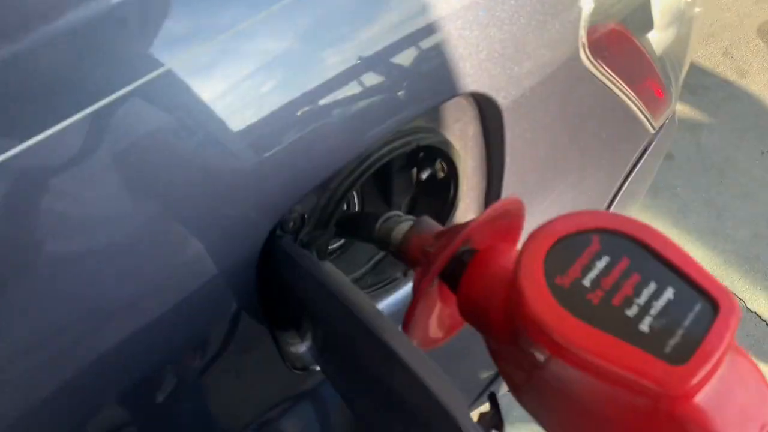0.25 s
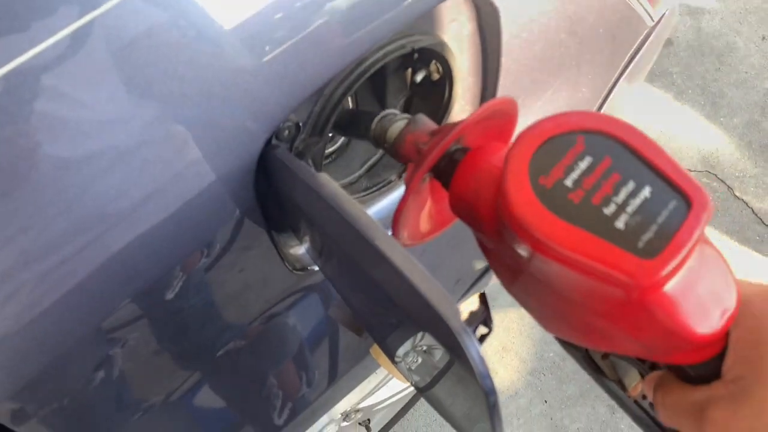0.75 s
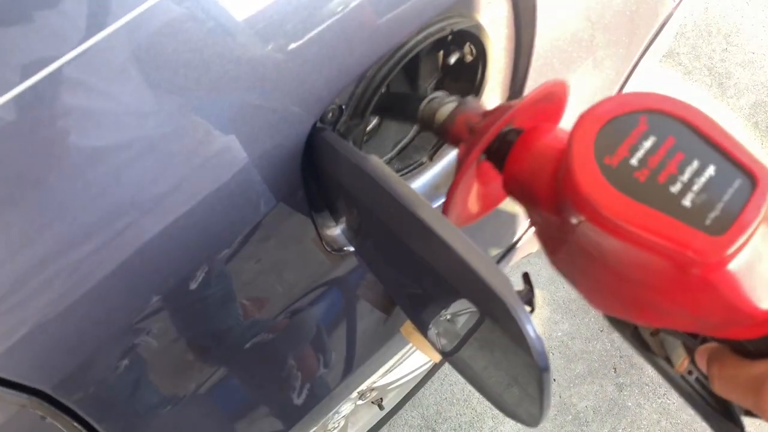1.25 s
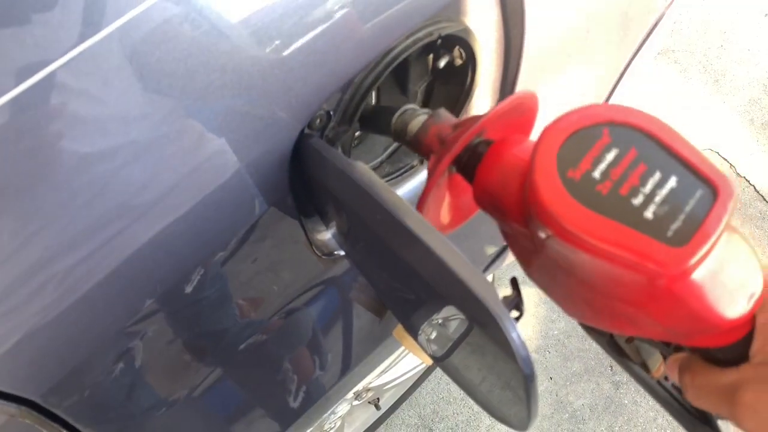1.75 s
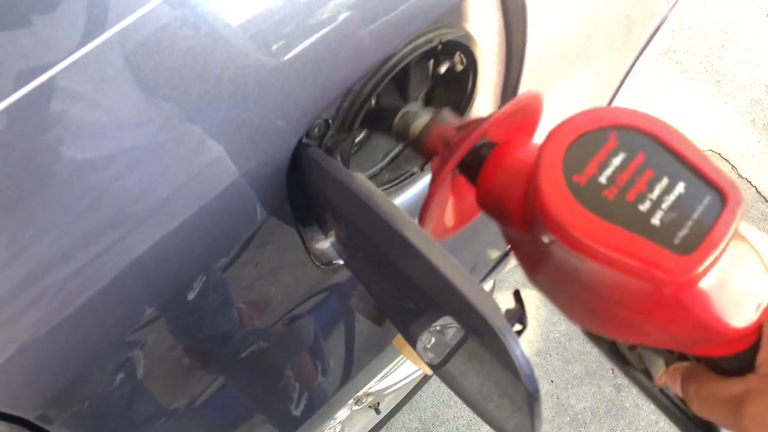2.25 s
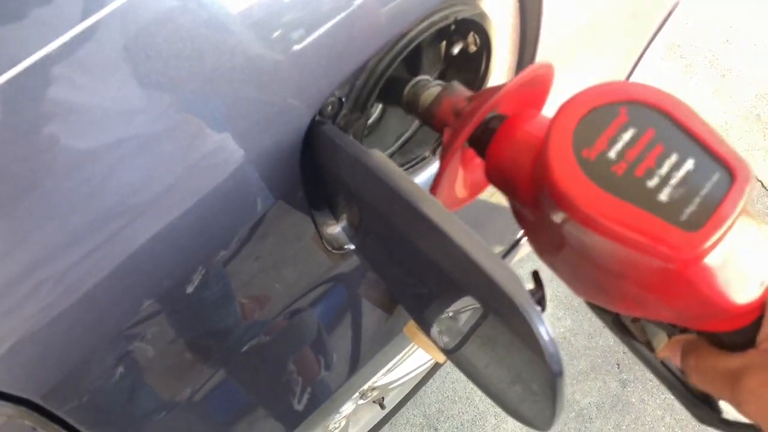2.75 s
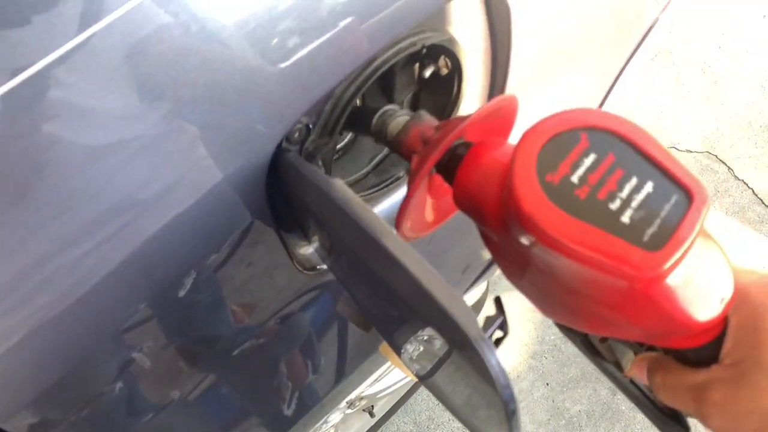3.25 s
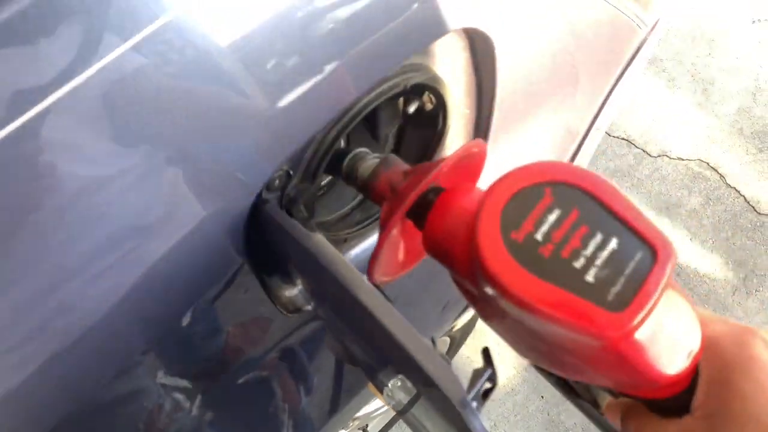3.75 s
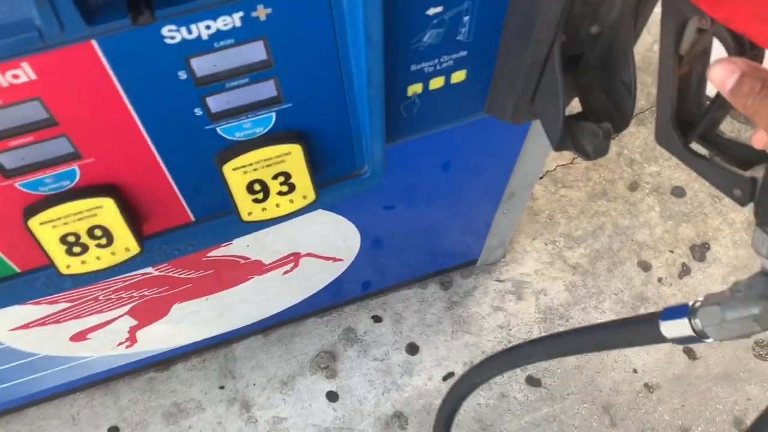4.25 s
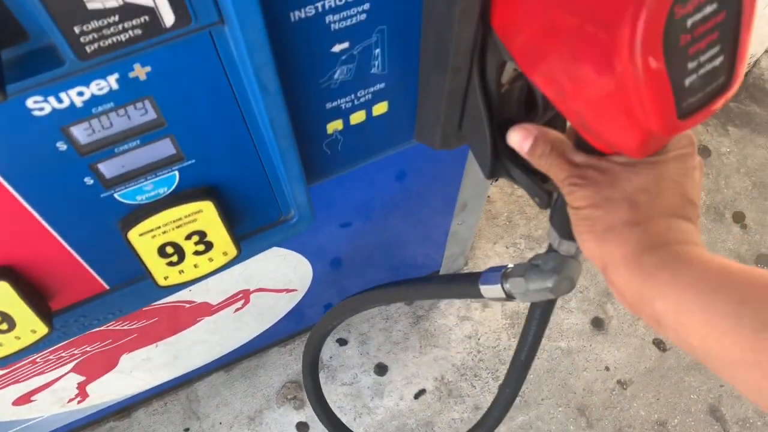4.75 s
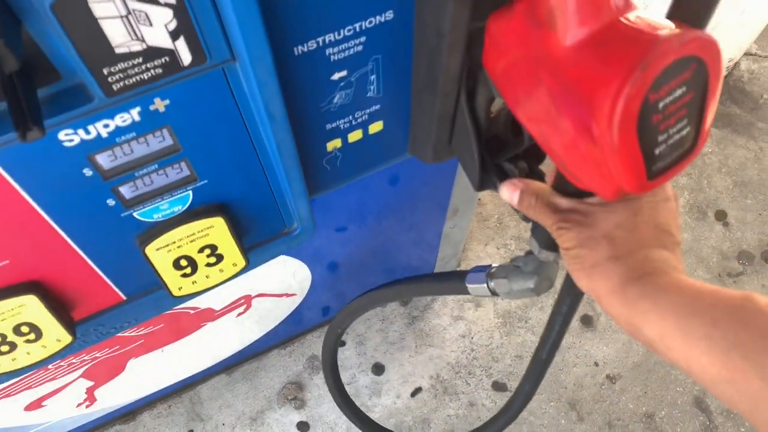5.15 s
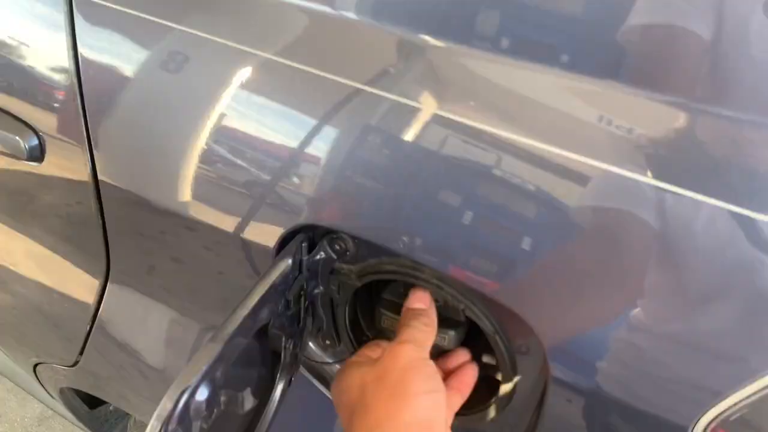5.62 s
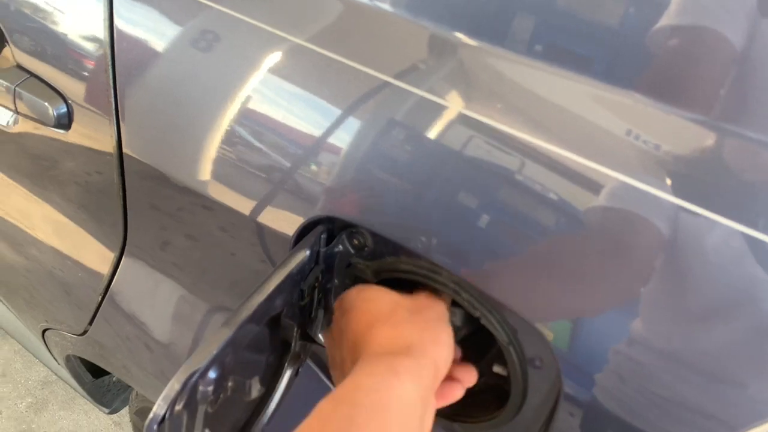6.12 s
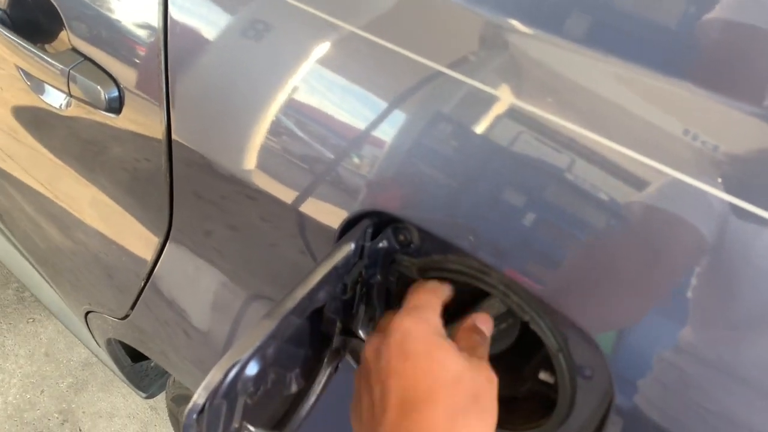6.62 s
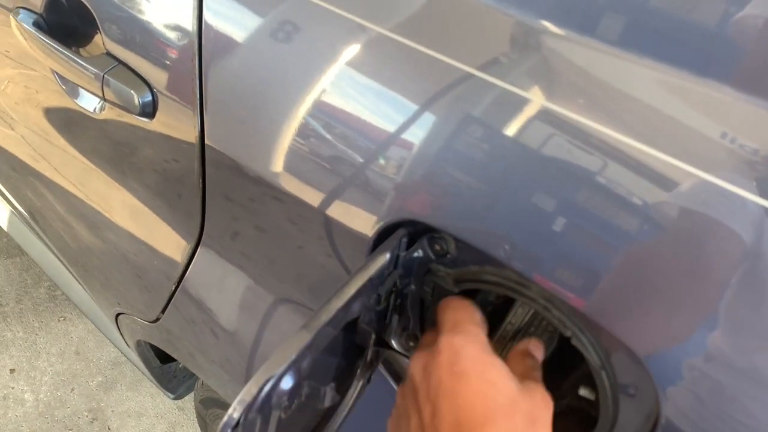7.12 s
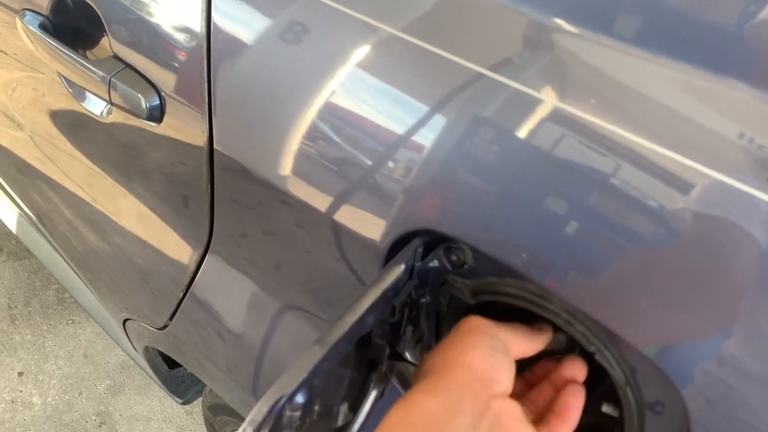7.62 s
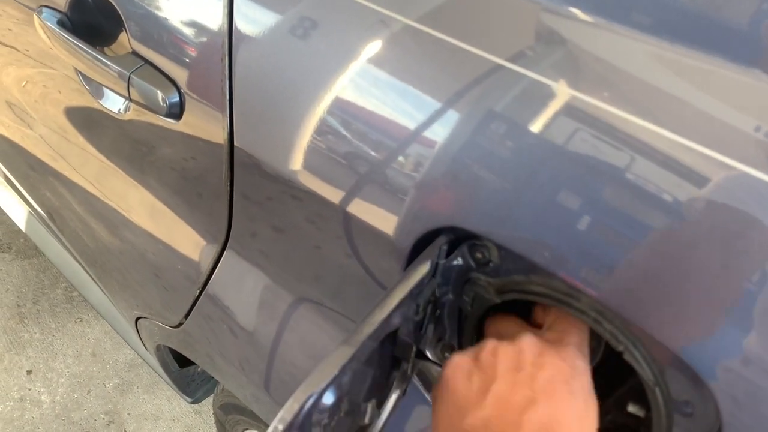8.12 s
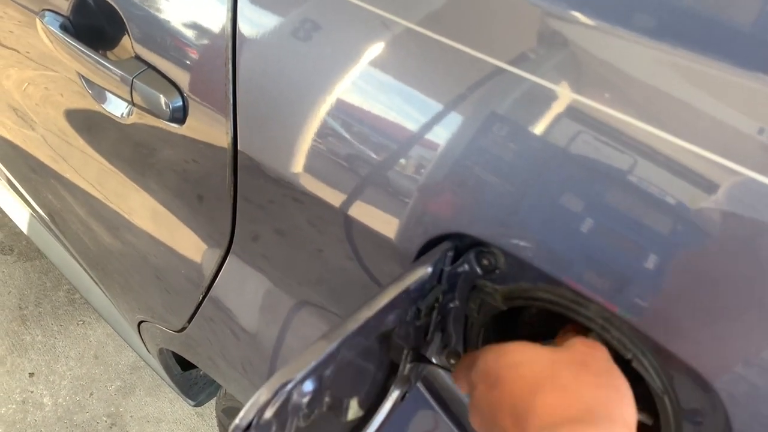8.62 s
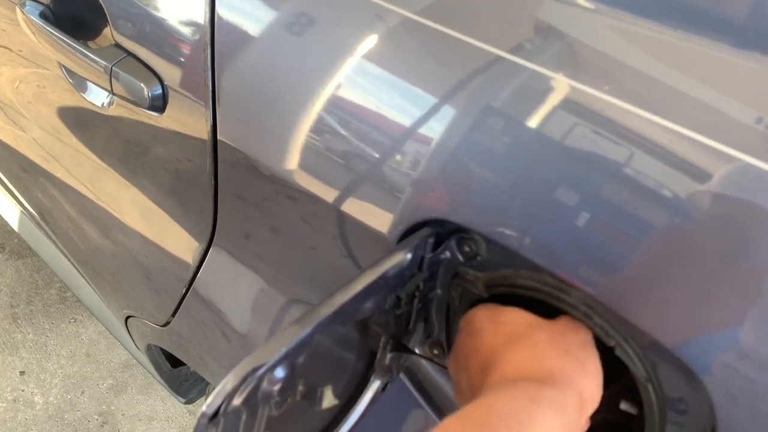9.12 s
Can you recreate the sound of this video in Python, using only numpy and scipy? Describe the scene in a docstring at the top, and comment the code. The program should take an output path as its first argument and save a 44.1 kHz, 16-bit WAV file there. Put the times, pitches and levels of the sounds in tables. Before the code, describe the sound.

Outdoors at a fuel pump, heard close in stereo. From 0 to 0.25 s a fluttering, low rushing noise and cabinet hum; then an abrupt change to a steady low motor hum, drones, traffic rumble, soft air and thin hiss that last to about 9.4 s. A faint bump at 0.3 s. From 0.45 s loud, bright metallic clacks of a squeezed nozzle valve, about five a second, quickening to around ten or more until 3.75 s, with a weak one near 3.95 s. Knocks at 4.0-4.1 s, a brief dip, then hard plastic-and-metal clatter with a deep cabinet thud at 4.2-4.3 s and again at 4.55-4.8 s, small taps to 5.05 s. An engine revs faintly, 4.4-5.3 s. After a dip at 5.65 s, a cap rubs and catches: strong hollow pops near 5.96 and 8.0 s, lighter creaks and snaps between and until 8.95 s, when one drone stops.

```python
"""At a fuel pump: first, for a quarter second, the fluttering rush and hum (noise, sine waves) before the cabinet.
Beside the car, a motor and engines (sines) hum on over rumble, air and a thin hiss (shaped noise).
The nozzle bumps the neck; short squeezes clack its valve about nine times a second (noise and ringing parts).
It is then knocked back into its holster (rattling noise, plastic and metal ringing), shaking the cabinet.
Last, the cap rubs and catches on its thread (noise and neck ringing). The canopy faintly answers the handling."""
import sys
import numpy as np
from scipy import signal
from scipy.fft import rfft, irfft, next_fast_len
from scipy.io import wavfile
from scipy.ndimage import uniform_filter1d, map_coordinates

SR = 44100
rng = np.random.default_rng(int(sys.argv[2]) if len(sys.argv) > 2 else 0)


def wav_record(signal):
    """Record a signal, one row per channel, as 16-bit PCM in the file named by sys.argv[1]."""
    frames = np.transpose(np.atleast_2d(signal))
    bounded = np.clip(frames, -1, 1)
    # unit amplitude maps onto the largest positive 16-bit level
    quanta = np.round(bounded * 32767).astype(np.int16)
    wavfile.write(sys.argv[1], SR, quanta)


N = 413216

# ringing of the metal spout: [multiple of its pitch, level/dB, time to fall 60 dB/s]
SPOUT_MODES = [(.905, -14, .035), (.985, -3, .036), (1, 0, .036), (1.025, -6, .032)]
# ringing of the spout's tip: [multiple of its pitch, level/dB, time to fall 60 dB/s]
TIP_MODES = [(1, 0, .036), (1.025, -6, .032)]
# the spout's highest ringing: [f/Hz, level/dB, time to fall 60 dB/s]
SPOUT_OVERTONES = [(8330, -3, .04), (9820, 0, .04)]
# colour of hard metal contacts: [f/Hz, level/dB]
METAL_COLOUR = [(700, -2), (1100, -14), (1500, -0.5), (2000, 5), (2600, -5.5), (4100, 5.5), (4800, -4.5),
                (5800, 2.5), (7200, -4), (8900, -6.5), (9900, -5.5), (11500, -6.5), (15500, -22.5)]


def amp(db):
    """Turn decibels into a gain."""
    return 10 ** (np.asarray(db) / 20)


def unit(x):
    """Scale to an average (rms) level of 1."""
    return x / np.sqrt(np.mean(x ** 2) + 1e-20)


def along(points, hz):
    """Read a curve of (f/Hz, value) points on a logarithmic frequency axis."""
    f, v = np.transpose(points)
    return np.interp(np.log(hz + 1), np.log(f + 1), v)


def clock():
    """Give the time of every sample in seconds."""
    return np.arange(N) / SR


def curves(rows):
    """Join each column after the time into a curve with one value per sample."""
    s, *columns = np.transpose(rows)
    return [np.interp(clock(), s, column) for column in columns]


def wobble(rate):
    """Draw a smooth random curve through a given number of random points a second."""
    points = rng.standard_normal(int(N * rate / SR) + 4)
    return map_coordinates(points, [clock() * rate])


def fade(t, t60):
    """Die away exponentially, by 60 dB in t60 seconds."""
    return np.exp(-np.log(1000) * t / t60)


def swells(rows):
    """Make bell-shaped envelopes from (t/s, half length/s, level/dB) rows."""
    return sum(amp(db) * np.exp(-((clock() - s) / length) ** 2) for s, length, db in rows)


def add(track, s, sound):
    """Mix a sound into the track at time s."""
    part = track[:, max(round(s * SR), 0):][:, :sound.shape[-1]]
    part += sound[..., :part.shape[1]]


def filtered(x, response):
    """Change the strength and phase of each frequency by a response curve."""
    n = x.shape[-1]
    padded = next_fast_len(n + SR // 10)
    spectrum = rfft(x, padded) * response(np.fft.rfftfreq(padded, 1 / SR))
    return irfft(spectrum, padded)[..., :n]


def rush(spectrum, size=N):
    """Make coloured stereo noise of rms 1, partly alike in both channels."""
    # how alike left and right are: [f/Hz, likeness from 0 to 1]
    likeness = [(100, 1), (330, 0.7), (550, 0.95), (1100, 0.78), (1600, 0.2), (3300, 0.042), (5200, 1),
                (9000, 0.89), (15000, 1)]

    def colour(hz):
        # the angle sets how much noise is shared (mid) and how much is opposed (side)
        angle = np.arccos(np.clip(along(likeness, hz), 0, 1)) / 2
        return amp(along(spectrum, hz)) * [np.cos(angle), np.sin(angle)]

    mid, side = filtered(rng.standard_normal((2, size)), colour)
    return unit(np.array([mid + side, mid - side]))


def patchy(x, depth_db):
    """Moving air lifts and sinks patches of the spectrum; the result has rms 1."""
    z = signal.stft(x, nperseg=1024)[2]
    field = uniform_filter1d(rng.standard_normal(z.shape[1:]), size=3, axis=0)
    field = uniform_filter1d(field, size=6, axis=1)
    return unit(signal.istft(z * amp(depth_db * unit(field)), nperseg=1024)[1][:, :N])


def pitched(modes, hz):
    """Multiply the first column of a mode table by a pitch or pitch factor."""
    return np.array(modes) * [hz, 1, 1]


def ring(modes, t, detune):
    """Ring struck modes; every blow lands differently, so pitch, strength and phase vary."""
    hz, db, t60 = np.transpose(modes)[:, :, None]
    pitch, strength, phase = rng.uniform(-1.09, 1, (3, len(modes), 1))
    waves = np.sin(2 * np.pi * (hz * (1 + detune * pitch) * t + phase))
    gains = amp(db + 5 * strength)
    return np.sum(gains * waves * fade(t, t60), 0) / np.linalg.norm(gains)


def rattle(t, rate, t60):
    """Make an envelope of tiny rebounds at random moments, rms 1."""
    kicks = rng.random(len(t)) < rate / SR
    bounces = signal.fftconvolve(kicks, fade(t, t60))[:len(t)]
    return unit(1 + unit(bounces))


def contacts(modes, rate):
    """Tiny contacts of random force, at random moments, ring the modes; rms 1."""
    t = np.arange(SR // 8) / SR
    kicks = (rng.random(N) < rate / SR) * rng.standard_normal(N)
    one_contact = (1 - fade(t, .002)) * ring(modes, t, detune=.02)
    return unit(signal.fftconvolve(kicks, one_contact)[:N])


def drone(turns, db):
    """Make a slightly unsteady sine wave around the given rms level."""
    level = np.sqrt(2) * amp(db + 0.22 * wobble(2.52))
    return level * np.sin(2 * np.pi * turns + 0.2 * wobble(2.94))


def arrive(x, lead):
    """The microphone pair shifts phase between the sides by frequency and direction."""
    return filtered(x, lambda hz: np.exp(np.array([[.5j], [-.5j]]) * along(lead, hz)))


def walls(x):
    """Hard surfaces nearby add echoes that comb distant sound with fixed ripples."""
    # car side, ground and pumps: [delay/s, share]
    reflections = [(.0047, 0.03), (.0073, 0.15), (0.014, 0.19), (0.021, -0.099), (0.027, 0.031),
                   (0.036, 0.043)]
    return x + sum(share * np.roll(x, round(delay * SR), axis=-1) for delay, share in reflections)


def cabinet():
    """Right in front of the pump, patchy noise flutters and steady sine waves hum."""
    # colour of the rush: [f/Hz, level/dB]
    rush_colour = [(40, -44), (100, -4), (170, -0.5), (300, -2.5), (450, -11), (560, -4), (800, -9.5),
                   (1000, -13), (1300, -21), (1900, -19), (2800, -23.5), (6000, -19), (10000, -28.5),
                   (15500, -17.5)]
    # hum inside the cabinet: [f/Hz, level/dB]
    hum_lines = [(122, -38), (162.5, -29), (244, -34), (300, -42.5), (352, -43.5), (552, -50), (586, -37),
                 (655, -54), (740, -54), (830, -54)]
    flutter = amp(-25.5 + 0.76 * wobble(28.6)) * patchy(rush(rush_colour), depth_db=2.5)
    hum = sum(drone(hz * clock(), db) for hz, db in hum_lines)
    return walls(flutter) + hum


def motor():
    """A motor hums at multiples of its drifting pitch, among the drones of machines and engines."""
    # course of the motor: [t/s, f/Hz, added level/dB]
    motor_course = [(.25, 44.05, -1), (1.5, 44.4, -1.5), (2.2, 44.85, -2.5), (4.1, 44.8, -2),
                    (4.4, 45.4, -1.5), (6.5, 45.37, 0), (9.37, 45.35, 0)]
    # strength of its overtones: [multiple of motor pitch, level before the course/dB]
    overtones = [(1, -31.7), (2, -27), (3, -39)]
    # other machines: [f/Hz, level/dB]
    machines = [(133.5, -50.5), (277, -49.5)]
    # another engine idles and revs briefly: [t/s, f/Hz, level/dB]
    idler_course = [(.3, 157, -36), (1.5, 159, -39.5), (4, 158, -43), (4.4, 162, -32.5), (4.9, 172, -34.5),
                    (5.6, 177, -57), (6.5, 165, -71), (8, 158, -43), (9.3, 156, -48.5)]
    t = clock()
    motor_hz, motor_db = curves(motor_course)
    turns = np.cumsum(motor_hz) / SR
    hum = sum(drone(k * turns, db + motor_db) for k, db in overtones)
    others = sum(drone(hz * t, db) for hz, db in machines)

    # a firm drone, perhaps a fan, that stops near the end
    fan_hz, fan_db, fan_off_s = 176.5, -34.5, 8.97
    fan = drone(fan_hz * t, fan_db) * np.clip((fan_off_s - t) / 0.066, 0, 1)

    idler_hz, idler_db = curves(idler_course)
    idler = drone(np.cumsum(idler_hz) / SR, idler_db)

    # a distant engine draws away
    engine_hz, engine_start_db, engine_fade_db_per_s = 74.3, -28.5, 2.5
    engine_turns = engine_hz * t + 0.3 * wobble(0.96)
    engine = drone(engine_turns, engine_start_db - engine_fade_db_per_s * t)
    return hum + others + fan + idler + engine


def near_panel(x):
    """One close reflection with a drifting delay gives the background a hollow, shifting colour."""
    # the nearest panel reflects as the microphone moves: [t/s, delay/s, share]
    reflection = [(4.2, .0023, 0), (4.9, .00232, .25), (5.5, .00223, .28), (5.8, .0023, 0),
                  (6.2, .00243, .1), (7, .00243, .3), (8.2, .00243, .32), (9.2, .0024, .3)]
    delay, share = curves(reflection)
    echo = np.array([map_coordinates(side, [np.arange(N) - delay * SR]) for side in x])
    return (x + share * echo) / np.sqrt(1 + share ** 2)


def forecourt():
    """Shaped noise makes traffic rumble, open air, a thin high hiss and, later, faint noisy tones."""
    # colour of distant traffic: [f/Hz, level/dB]
    rumble_colour = [(20, -30), (30, -21), (40, -1), (60, 2.5), (85, 1), (108, 1.5), (150, 1), (210, -3),
                     (300, -6), (450, -11.5), (800, -13.5), (1400, -38), (3000, -60)]
    # colour of open air: [f/Hz, level/dB]
    air_colour = [(400, -3), (1000, 8), (1750, 4.5), (2600, -1), (3500, -1.5), (5000, -3.5), (7000, -6),
                  (11000, -24), (15500, -65)]
    # colour of the high hiss: [f/Hz, level/dB]
    hiss_colour = [(4000, -48), (7000, -14.5), (8200, 0.5), (9600, 5.5), (11500, 3), (12800, 0),
                   (14200, -7), (15700, -18.5)]
    # faint noisy tones near 1.2 and 1.7 kHz join later: [f/Hz, level/dB]
    tones_colour = [(1050, -22), (1215, 11), (1400, -20), (1660, 36), (1820, -24), (2200, -44)]
    t = clock()
    rumble_db, air_db, patchy_db, air_patchy_db = -30, -39.5, 1.6, 2.3
    rumble = amp(rumble_db + 0.19 * wobble(14)) * patchy(rush(rumble_colour), patchy_db)
    air = amp(air_db + .9 * wobble(12)) * patchy(rush(air_colour), air_patchy_db)

    # the hiss grows once the nozzle is put away
    hiss_start_db, swell_db, swell_from_s, swell_time_s = -42.5, 5.5, 4.64, 0.61
    on_s, attack_s, off_s, release_s = 0.084, 0.33, 9.08, 0.099
    swell = 1 - np.exp(-np.maximum(t - swell_from_s, 0) / swell_time_s)
    hiss_db = hiss_start_db + swell_db * swell
    hiss_on = np.clip((t - on_s) / attack_s, 0, 1) * np.clip(1 - (t - off_s) / release_s, 0, 1)
    hiss = hiss_on * amp(hiss_db + 0.61 * wobble(10.0)) * patchy(rush(hiss_colour), patchy_db)

    late_tones = amp(-51.0) * np.interp(t, [6, 6.8], [0, 1]) * rush(tones_colour)
    return rumble + late_tones + near_panel(walls(air + hiss))


def holster():
    """The nozzle bumps the filler neck, then rattles and clinks in its holster; heavy blows push a panel."""
    # bumps on the neck, then the holster: [t/s, level/dB, metal edge level/dB, pitch factor]
    knocks = [(0.283, -37, 10.5, 1.05), (4.019, -27.5, 0, 0.82), (4.034, -26, -5, 1),
              (4.11, -12, -4.5, 0.81), (4.222, -18.5, -17, 0.95), (4.228, -14.5, -19, 0.88),
              (4.237, -25, -17, 0.98), (4.252, -24, -7, 1.1), (4.266, -21, -3.5, 1.3),
              (4.286, -24.5, -0.5, 1.3), (4.548, -28.5, -17, 0.91), (4.586, -12.5, -22, 0.95),
              (4.592, -21, -23, 0.91), (4.635, -25.5, -6, 1.1), (4.656, -21.5, -0.5, 1.13),
              (4.693, -20, -9, 1.05), (4.745, -27, -19, 1.1), (4.795, -32, -25, 0.95),
              (4.976, -37, -22, 1.2), (5.043, -28.5, -20, 0.9)]
    # colour of the scuffing plastic: [f/Hz, level/dB]
    scuff_colour = [(150, -1), (400, 3.5), (800, 8), (1700, -4.5), (2700, -1), (4200, -29), (7000, -27),
                    (14000, -53)]
    # ringing of the plastic shell: [f/Hz before the pitch factor, level/dB, time to fall 60 dB/s]
    shell_modes = [(470, -3, 0.026), (798, 5, 0.032), (1026, -9, 0.063), (1400, -8.0, 0.045),
                   (1724, -7, 0.037), (2024, 1, 0.026), (2650, -2, 0.023), (3100, -18, 0.015)]
    # heavy blows that shake the cabinet: [t/s, level/dB]
    thuds = [(4.227, -6.5), (4.2354, -10), (4.263, -22), (4.584, -22), (4.674, -21)]
    # ringing of the cabinet's panel: [f/Hz, level/dB, time to fall 60 dB/s]
    panel_modes = [(82.7, -10, 0.32), (114, -2, 0.12), (188, -3, 0.075), (310, -11, 0.04)]
    # the loose nozzle rattles as it settles: [t/s, half length/s, level/dB]
    settles = [(4.255, 0.052, -36), (4.66, 0.065, -40)]
    out, t = np.zeros((2, N)), np.arange(SR // 8) / SR
    spout_hz, tip_hz, rattles_per_s = 5750, 7150, 210  # the spout hangs free
    free_spout = np.vstack([pitched(SPOUT_MODES, spout_hz), pitched(TIP_MODES, tip_hz), SPOUT_OVERTONES])
    for s, db, edge_db, pitch in knocks:
        rebounds = rattle(t, rate=340, t60=0.0058)
        scuff = amp(-1.5) * fade(t, 0.063) * rebounds * rush(scuff_colour, size=len(t))
        shell = amp(1.5) * ring(pitched(shell_modes, pitch), t, detune=.03)
        metal = amp(-4) * ring(free_spout, t, detune=0.04)
        scrape = fade(t, 0.029) * rush(METAL_COLOUR, size=len(t))
        edge = amp(edge_db - 1) * (scrape + metal)
        add(out, s, amp(db) * (1 - fade(t, 0.0048)) * (scuff + shell + edge))

    panel = sum(amp(db) * fade(t, t60) * np.sin(2 * np.pi * hz * t) for hz, db, t60 in panel_modes)
    for s, db in thuds:
        add(out, s, amp(db) * (1 - fade(t, .012)) * panel)
    return out + swells(settles) * contacts(shell_modes, rattles_per_s)


def canopy(x):
    """Roof and pumps give a weak, late answer: a tail of noise fading at its own rate in each pitch range."""
    # how fast the answer dies: [f/Hz, time to fall 60 dB/s]
    decay = [(200, 0.059), (2000, 0.25), (10000, 0.13)]
    hz, _, z = signal.stft(rng.standard_normal((2, SR // 3)), SR, nperseg=256)
    t = np.linspace(0, 1 / 3, z.shape[-1])
    tail = signal.istft(z * fade(t, along(decay, hz)[:, None]), SR, nperseg=256)[1]
    late = np.pad(x, ((0, 0), (round(0.017 * SR), 0)))
    return signal.fftconvolve(late, tail / np.linalg.norm(tail[0]), axes=1)[:, :N]


def valve():
    """Each clack: the stem slides, strikes and chatters, parts ring, the poppet rebounds, a spring ticks."""
    # valve clacks; the shifting grip rings the parts differently: [t/s, level/dB,
    # then level over that/dB of lever, handle, poppet (the valve's plug), spout, spout tip;
    # f/Hz of handle, poppet, spout, spout tip; spring tick's delay/s, its level/dB]
    clacks = [(0.4452, -9.5, -12, -15, -11.0, 2.5, -3.5, 1940, 4480, 5710.0, 7080.0, 0.023, -31),
              (0.634, -11.5, -4, -18.0, 3, 1, 4.5, 2120, 3640, 5670, 7090, 0.032, -19),
              (0.838, -10, -7, -9, -2, 3.5, -2.5, 2000, 4320, 5730, 7240.0, 0.025, -15),
              (1.04, -9, -9, -11, -2, -1.0, -8, 2090, 4310, 5750, 7170, 0.027, -17),
              (1.2207, -9.5, -14, -27, -9, -6.0, -10, 2010, 4230, 6010.0, 7090, 0.015, -29),
              (1.3245, -12.0, -25, -8.5, -16.0, 1, 0, 2000.0, 3750.0, 5710.0, 7150.0, 0.027, -26),
              (1.4109, -8.5, -14.5, -16, -19.0, 3.5, -4, 2100, 4270.0, 5720.0, 7200, 0.028, -21),
              (1.5894, -9.0, -12, -16, 0.5, 0.0, -5.5, 2150, 4220, 5710.0, 7200, 0.026, -22),
              (1.71, -12.5, -21.0, -7, 1, 6.5, 3, 1784, 4180.0, 5920, 7180, 0.022, -33),
              (1.7802, -8, -13, -15, -4.0, 4.0, -5, 2120, 4240.0, 5710, 7180, 0.025, -25),
              (1.9678, -8, -8.0, -9, -4, 1.5, -7.5, 1780.0, 4330, 5680.0, 7090.0, 0.022, -26),
              (2.052, -11, -16.0, -16, 6.5, 3.5, -1.5, 1670, 4080, 5970.0, 7170, 0.024, -33),
              (2.139, -10.5, -14, -10, 5, -9, -7.5, 1826, 3820, 5500, 7420.0, 0.039, -24),
              (2.2657, -23.5, -5, -4, 8.0, 6.0, -4.0, 1950, 4130, 5880.0, 7140.0, 0.033, -31),
              (2.3229, -10.5, -10, -5, 4, -23.0, -12, 1970, 3660, 5800, 7160, 0.025, -22),
              (2.4144, -9.5, -21, -10, 5, 1.0, -4.5, 2250, 3970, 5730, 7140.0, 0.027, -28),
              (2.5001, -11.0, -10.5, -9, 3.5, -3, -6.0, 1970.0, 3450, 5570, 7300, 0.028, -27),
              (2.595, -13.5, -21.0, -4.5, -2, -0.5, -4, 1955, 4480, 5660, 7200, 0.033, -32),
              (2.6727, -11, -13.5, -6.5, -8.0, -10.0, -9, 2050, 3690, 5940, 7080.0, 0.028, -25),
              (2.7892, -11, -26, -7.5, -2, -16.0, -9.0, 1924, 4300, 5650.0, 7220.0, 0.026, -28),
              (2.86, -9.5, -18, -9, 3.5, -6.5, -6, 2080, 3700, 5870, 7030, 0.029, -22),
              (2.9594, -9.0, -34.0, -10, -2, -7, -8, 2050, 4030, 5570, 7180, 0.021, -29),
              (3.034, -17, -9.5, -3.5, -3.0, -10, -5.0, 2090, 3980, 5930, 7060, 0.021, -29),
              (3.148, -9, -30.0, -12.0, -5, -9.5, -7, 1976, 4080, 5740.0, 7300, 0.043, -26),
              (3.22, -20, -10, -4.5, -21.0, -18.0, -6, 2100, 3780, 5930, 7070, 0.023, -24),
              (3.331, -8.5, -24.0, -11, -2.5, -9.5, -7.0, 2130, 4210, 5740.0, 7440, 0.029, -29),
              (3.3952, -9.5, -23.0, -13.5, -7, -6.0, 2.5, 1800.0, 3720, 5750.0, 7340, 0.023, -22),
              (3.5032, -9.5, -12.5, -8.5, 0, -0.5, -1, 1820, 3980, 5730, 7110.0, 0.021, -32),
              (3.57, -16, -12, -9, -11.0, -12.0, -4, 2100.0, 4500.0, 6000, 7110.0, 0.03, -37),
              (3.6645, -9, -15, -4.5, -6.0, -5.5, -3.5, 1760, 4110.0, 5900, 7200, 0.025, -32),
              (3.737, -8.5, -17, -24, -2, -8, -0.5, 2070, 4200, 5840.0, 7100.0, 0.028, -25),
              (3.9587, -24.5, -9, -7, -3.5, 0, -9, 1610, 3740.0, 5810.0, 7160, 0.031, -37)]
    # ringing of the lever: [f/Hz, level/dB, time to fall 60 dB/s]
    lever_modes = [(960, -10, 0.18), (1107, 5.5, 0.088), (1354, -11, 0.066)]
    # the gripped handle: [multiple of its pitch, level/dB, time to fall 60 dB/s]
    handle_modes = [(.87, -12.5, 0.15), (1, 7.5, 0.033), (1.14, -7.5, 0.12), (1.3, -18, 0.095),
                    (1.52, 0.5, 0.055)]
    # the poppet on its seat: [multiple of its pitch, level/dB, time to fall 60 dB/s]
    poppet_modes = [(.75, -15.5, 0.057), (.87, -11, 0.073), (.93, -6, 0.035), (1, 6.5, 0.027),
                    (1.06, -12.5, 0.039)]
    # colour of the lever's return spring: [f/Hz, level/dB]
    spring_colour = [(6000, -15), (8600, -6), (9500, 3), (10500, -10), (14000, -20)]
    # left-right tilt of the clacks: [f/Hz, left minus right/dB]
    lean = [(1100, 0), (2000, -0.5), (3500, -0.5)]
    out, t = np.zeros((2, N)), np.arange(SR // 10) / SR
    slide_s, slide_db = 0.0028, -23.5  # half length, level under the clack
    for (s, db, lever_db, handle_db, poppet_db, spout_db, tip_db,
         handle_hz, poppet_hz, spout_hz, tip_hz, tick_s, tick_db) in clacks:
        slide = amp(slide_db) * np.exp(-(t / slide_s - 2) ** 2) * rush(METAL_COLOUR, size=len(t))
        crack = amp(5.0) * fade(t, 0.0086) * (1 - fade(t, 0.0021)) * rush(METAL_COLOUR, size=len(t))
        rebounds = rattle(t, rate=600, t60=0.011)
        chatter = amp(-8.5) * fade(t, 0.074) * rebounds * rush(METAL_COLOUR, size=len(t))

        spout = amp(spout_db) * ring(pitched(SPOUT_MODES, spout_hz), t, detune=.005)
        tip = amp(tip_db) * ring(pitched(TIP_MODES, tip_hz), t, detune=.005)
        overtones = amp(-8) * ring(SPOUT_OVERTONES, t, detune=.02)
        poppet = amp(poppet_db) * ring(pitched(poppet_modes, poppet_hz), t, detune=.012)
        handle = amp(handle_db) * ring(pitched(handle_modes, handle_hz), t, detune=.015)
        lever = amp(lever_db) * ring(lever_modes, t, detune=0.019)
        grip = (handle + lever) * amp([[-1.5], [1.5]])  # the handle is to the right
        parts = amp(-0.46) * (spout + tip + overtones + poppet + grip)

        clack = amp(db) * (1 - fade(t, 0.003)) * (crack + chatter + parts)
        rebound = fade(t, 0.0046) * rush(METAL_COLOUR, size=len(t))
        tick = amp(-4.0) * fade(t, 0.01) * rush(spring_colour, size=len(t))
        add(out, s - 3 * slide_s, amp(db) * slide)
        add(out, s, clack)
        # the fuel door reflects it, with a delay that shifts as the hand moves
        add(out, s + rng.uniform(.0007, .0024), 0.33 * clack)
        add(out, s + .00759, .2 * clack)  # the ground reflects it too
        # the poppet bounces once on its seat
        add(out, s + rng.uniform(.005, 0.013), amp(db - 6.5) * rebound)
        add(out, s + tick_s, amp(tick_db) * tick)
    return filtered(out, lambda hz: amp(np.array([[.5], [-.5]]) * along(lean, hz)))


def cap():
    """The cap rubs and catches on its thread in tiny slips; the hollow filler neck colours both."""
    # catches: [t/s, level/dB, snap level/dB, rim level/dB, neck f/Hz]
    catches = [(5.803, -17.5, -10, -14, 1350), (5.849, -22, -14, -17, 1170), (5.958, -3.5, -5.5, -18, 1208),
               (6.379, -31.5, -5, -8, 1270), (6.857, -29, -20, -15, 1210), (6.886, -30, -16, -15, 1300),
               (6.956, -13, -33, -15, 1133), (6.978, -33, -18, 2, 1300), (6.996, -26, -9, -6, 1140),
               (7.031, -27, -21, -15, 1060), (7.129, -37, -18, -12, 1270), (7.292, -30, -15, -6, 1280),
               (7.318, -29, -15, -15, 1000), (7.646, -28, -3, -12, 1160), (7.667, -22, -3, -19, 1100),
               (7.707, -23.5, -14, -17, 1140), (7.809, -37, 11, -10, 1150), (8.001, -7, -12.5, -24, 1080),
               (8.059, -29, -18, -15, 1060), (8.427, -23, 0, 1, 1076), (8.719, -33, -14, -11, 1050),
               (8.741, -30, -12, -18, 960), (8.946, -30, 8, -4, 1180)]
    # ringing of the filler neck: [multiple of its pitch, level/dB, time to fall 60 dB/s]
    neck_modes = [(.7, -13, 0.034), (1, 0, 0.024), (1.06, -7.5, 0.052), (1.19, -12, 0.033),
                  (1.45, -29, 0.023), (1.7, -14, 0.027)]
    # ringing of the cap's rim: [f/Hz, level/dB, time to fall 60 dB/s]
    rim_modes = [(1866, 2, 0.02), (2130, -7, 0.015)]
    # a catch lets go in a few slips: [delay/s, level/dB]
    stutter = [(0, 0.5), (.0025, 1.5), (.0062, -6.5)]
    # the cap rubs on its thread: [t/s, half length/s, level/dB]
    twists = [(5.834, 0.026, -26.5), (5.95, .006, -27), (6.39, 0.084, -39.5), (6.875, 0.024, -35),
              (6.987, 0.018, -36), (7.304, 0.034, -33), (7.676, 0.067, -33.5), (8.04, 0.055, -37),
              (8.43, 0.016, -35), (8.73, 0.028, -39)]
    # colours of hollow slips and bright snaps: [f/Hz, level/dB]
    hollow = [(400, -9.5), (750, 2.5), (1050, 4.5), (1300, -6), (1600, -13), (2000, -17.0),
              (6000, -19.0), (14000, -58)]
    bright = [(700, -8.0), (2000, -15.0), (4500, 3.0), (7200, 0.0), (10000, 6.0), (15000, -24)]
    out, t = np.zeros((2, N)), np.arange(SR // 6) / SR
    for s, db, snap_db, rim_db, neck_hz in catches:
        neck = amp(7) * ring(pitched(neck_modes, neck_hz), t, detune=.02)
        rim = amp(rim_db) * ring(rim_modes, t, detune=.02)
        add(out, s, amp(db) * (1 - fade(t, 0.006)) * (neck + rim))
        for delay, slip_db in stutter:
            slip = amp(-6.5) * fade(t, 0.023) * rush(hollow, size=len(t))
            snap = amp(snap_db - 7) * fade(t, 0.025) * rush(bright, size=len(t))
            add(out, s + delay, amp(db + slip_db) * (1 - fade(t, 0.002)) * (slip + snap))

    # the thread binds just before each catch: half length, level under the catch
    grab_s, grab_db = .007, -19
    grabs = swells([(s - grab_s, grab_s, db + grab_db) for s, db, *_ in catches])
    rub_hz, slips_per_s = 1206, 160  # the neck's pitch while the cap rubs, rate of tiny slips
    creak = contacts(pitched(neck_modes, rub_hz), slips_per_s)
    rubbing = swells(twists) * (amp(-3.0) * creak + amp(-4) * rush(hollow))
    return out + grabs * rush(hollow) + rubbing


def scene():
    """A moment in front of the cabinet, then the work beside the car."""
    # phase of sound from the cabinet, straight ahead: [f/Hz, left's lead/radians]
    cabinet_lead = [(100, .2), (480, .5), (550, 2.2), (1300, 3), (2300, 3), (4000, 1.7), (5500, 3.4)]
    # phase of sound around the car: [f/Hz, left's lead/radians]
    around_lead = [(40, .2), (220, .6), (340, 1.9), (450, 2.9), (1000, 3.9), (1350, 4.4), (2000, 6.9),
                   (2800, 10.2), (4000, 14), (4900, 15.5), (5500, 15.9), (6300, 17.2), (8300, 18.85),
                   (10000, 19.8), (12400, 22), (15500, 25)]
    # phase of the nozzle, close by: [f/Hz, left's lead/radians]
    nozzle_lead = [(300, .6), (450, 2.9), (1100, 4.6), (1350, 4.2), (2100, 7.3), (2400, 5.8), (3000, 5.3),
                   (3500, 3.2), (4400, 2.1), (5500, 3.7), (6300, 4.6), (8300, 6.3), (10000, 7.2),
                   (15500, 12.4)]
    beside_car = np.clip((clock() - .245) / 0.012, 0, 1)
    at_cabinet = (1 - beside_car) * arrive(cabinet(), cabinet_lead)
    at_car = beside_car * arrive(motor() + forecourt(), around_lead)
    handling = arrive(holster() + cap(), around_lead) + arrive(valve(), nozzle_lead)
    return at_cabinet + at_car + handling + amp(-22.5) * canopy(handling)


def record(dry):
    """The microphone pair shifts balance by frequency; brief level dips; soft overload; band limit."""
    # balance of the pair: [f/Hz, left minus right/dB]
    balance = [(40, 3), (120, 4.5), (220, 10.5), (450, 1.5), (1000, 0.5), (3300, -1), (5500, 0)]
    # the level dips briefly: [t/s, half width/s, level/dB]
    dips = [(0.256, 0.015, -6.5), (4.084, 0.013, -21), (5.651, 0.017, -18)]
    top_hz = 15900
    sides = np.array([[1], [-1]]) / 2
    dip_db = sum(db * np.exp(-((clock() - s) / width) ** 2) for s, width, db in dips)
    x = filtered(dry, lambda hz: amp(sides * along(balance, hz))) * amp(dip_db)
    x = x / (1 + np.abs(x / .95) ** 6) ** (1 / 6)  # loud peaks bend softly towards .95
    return filtered(x, lambda hz: hz < top_hz)


dry = scene()
out = record(dry)
wav_record(out)
```